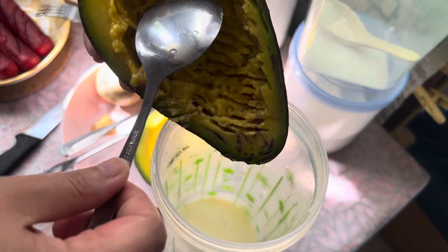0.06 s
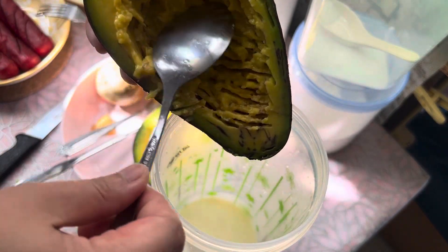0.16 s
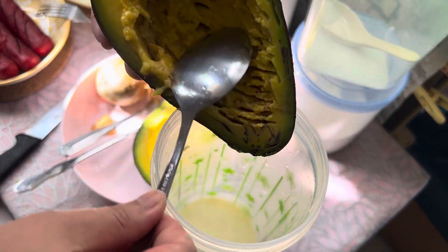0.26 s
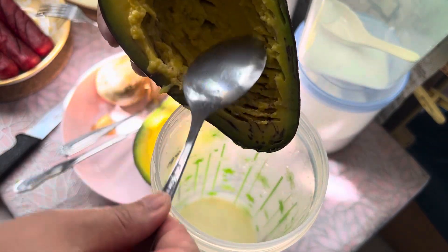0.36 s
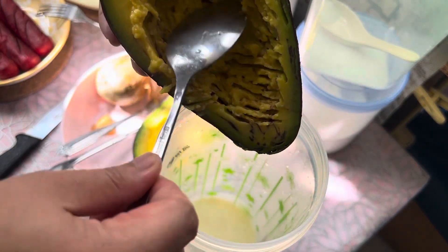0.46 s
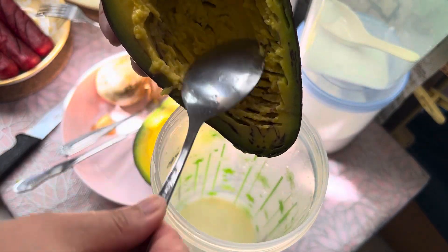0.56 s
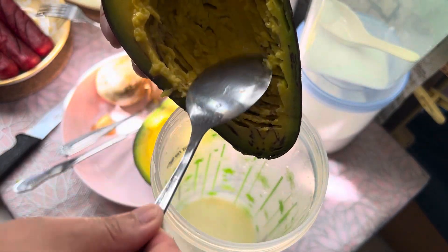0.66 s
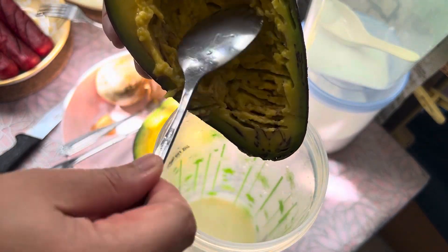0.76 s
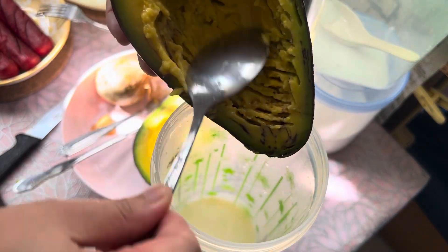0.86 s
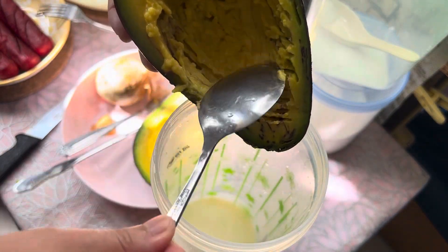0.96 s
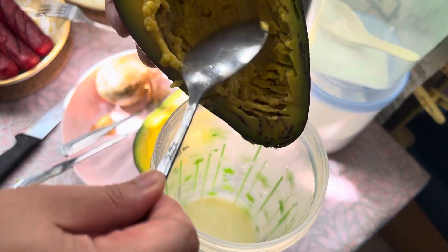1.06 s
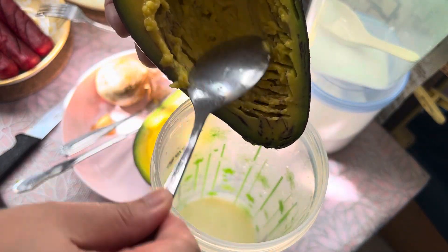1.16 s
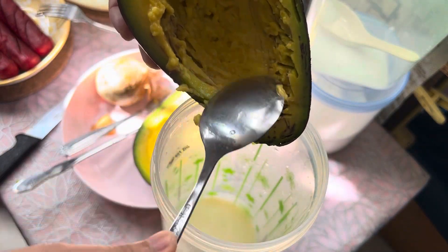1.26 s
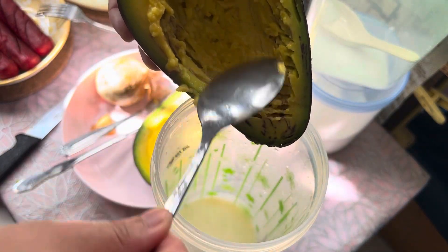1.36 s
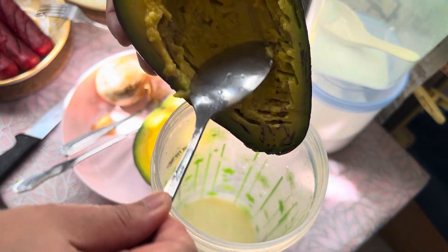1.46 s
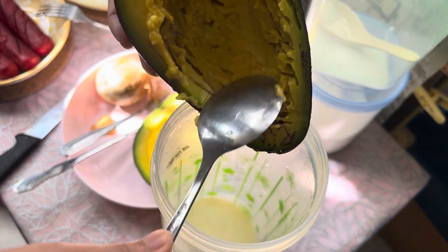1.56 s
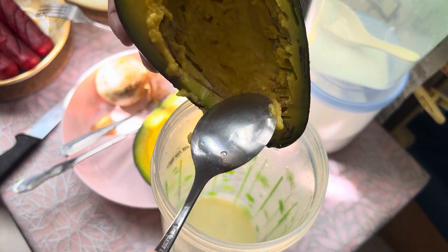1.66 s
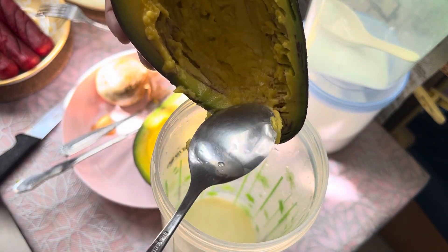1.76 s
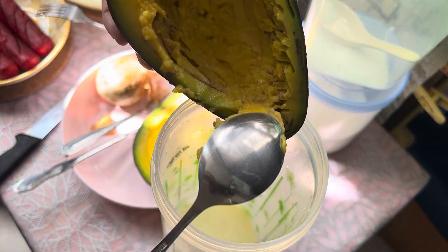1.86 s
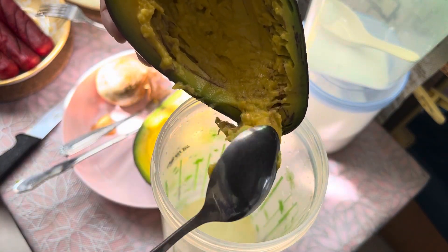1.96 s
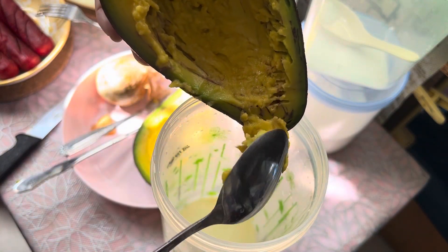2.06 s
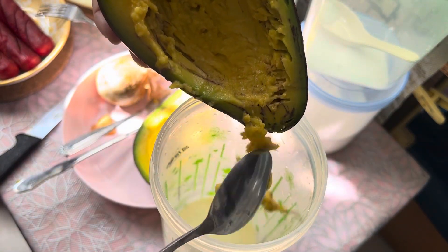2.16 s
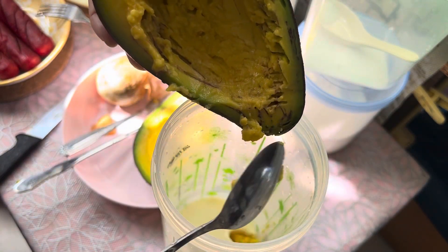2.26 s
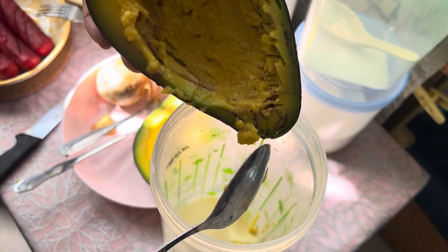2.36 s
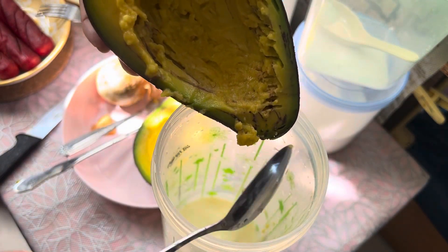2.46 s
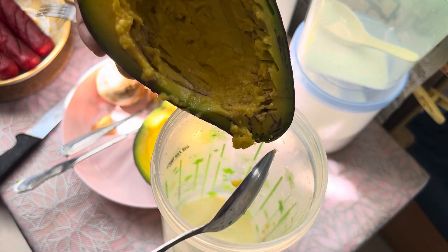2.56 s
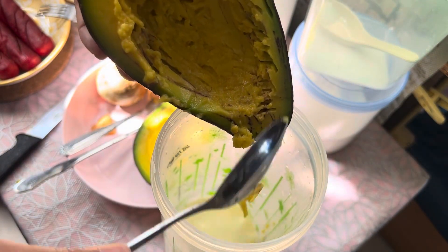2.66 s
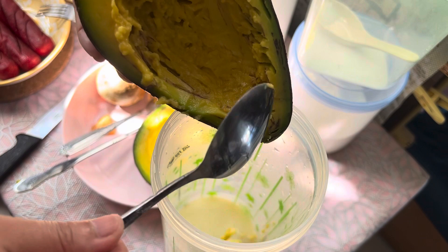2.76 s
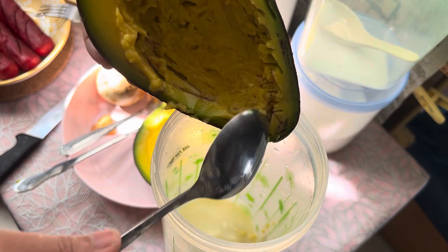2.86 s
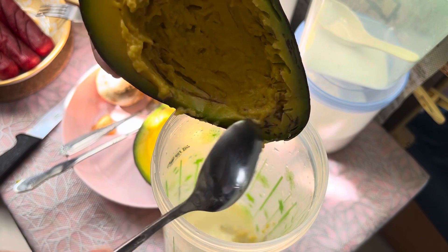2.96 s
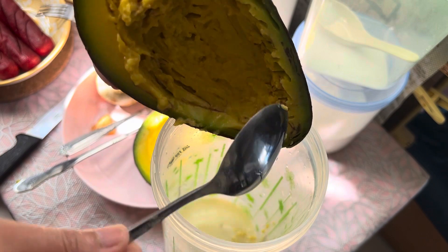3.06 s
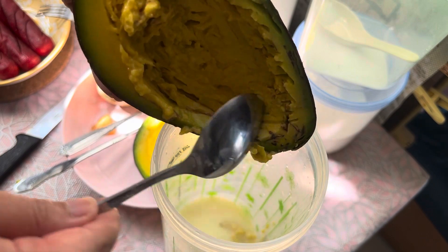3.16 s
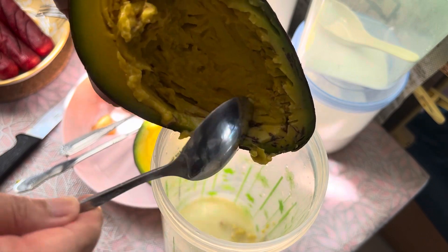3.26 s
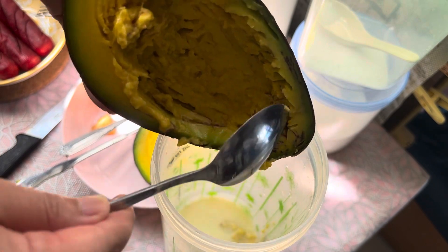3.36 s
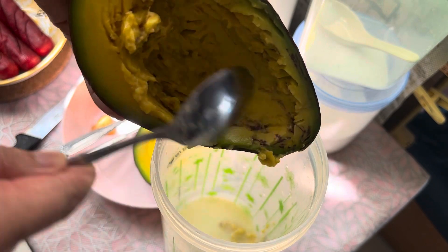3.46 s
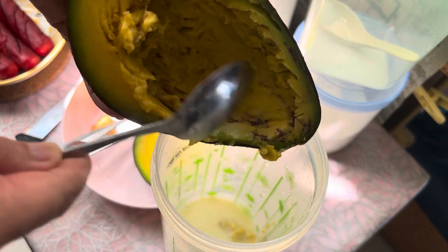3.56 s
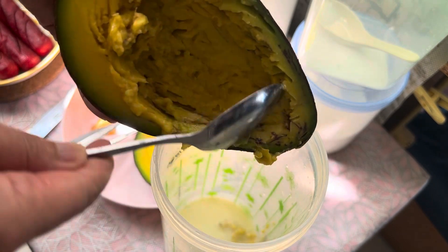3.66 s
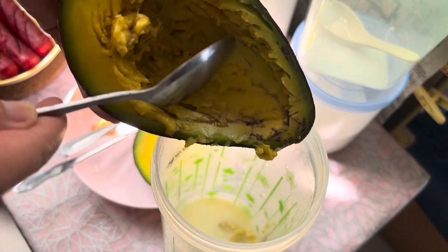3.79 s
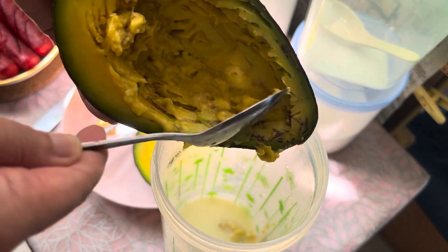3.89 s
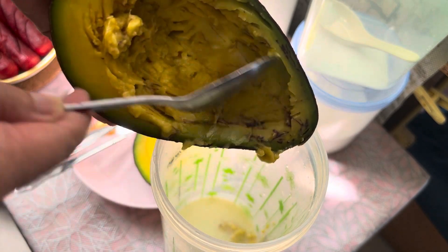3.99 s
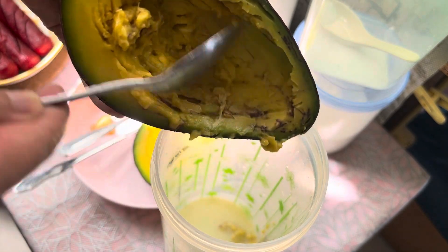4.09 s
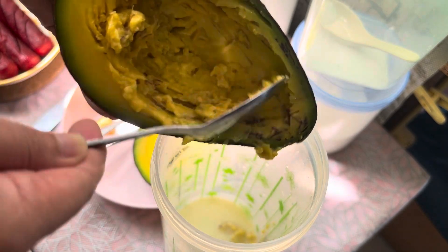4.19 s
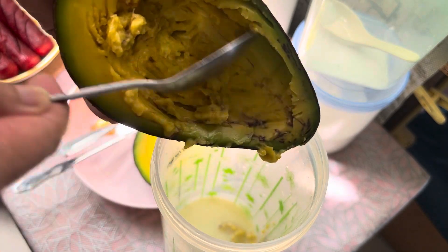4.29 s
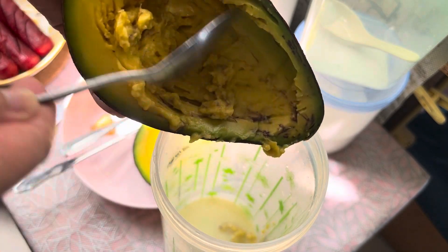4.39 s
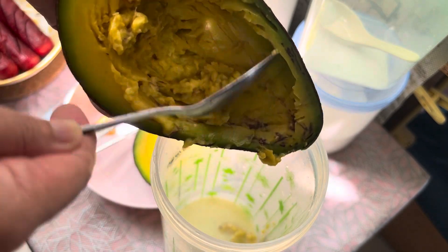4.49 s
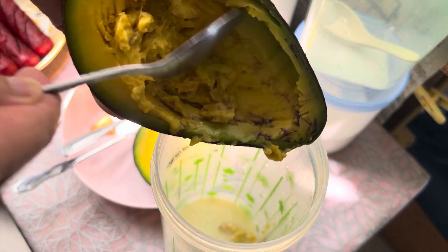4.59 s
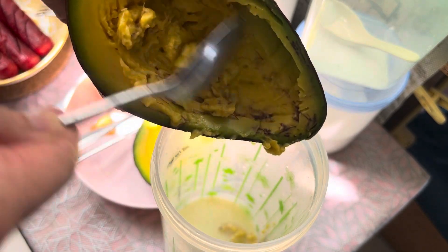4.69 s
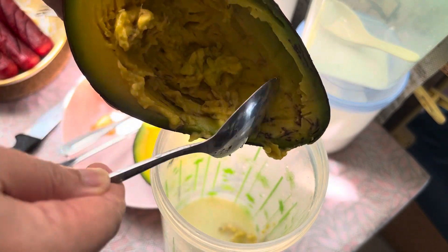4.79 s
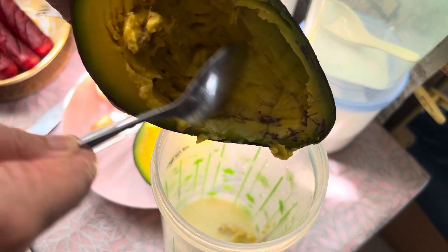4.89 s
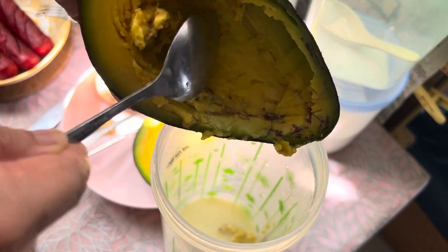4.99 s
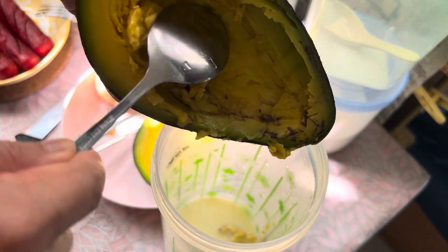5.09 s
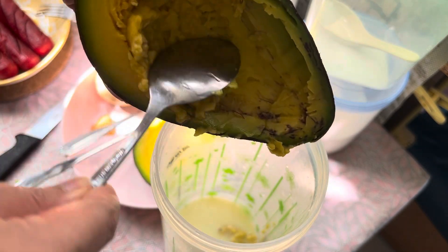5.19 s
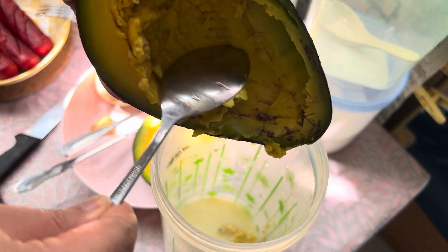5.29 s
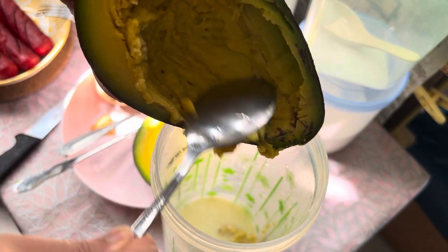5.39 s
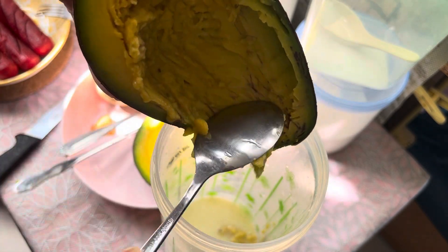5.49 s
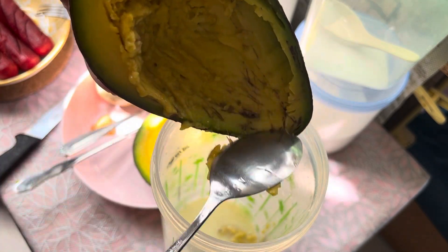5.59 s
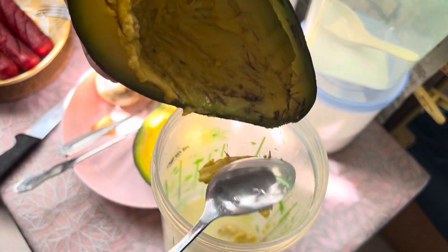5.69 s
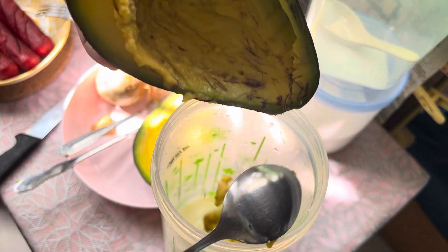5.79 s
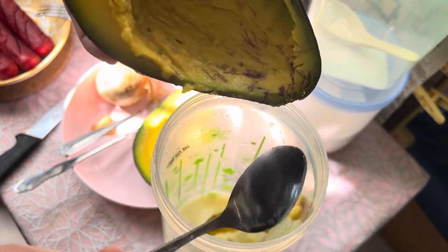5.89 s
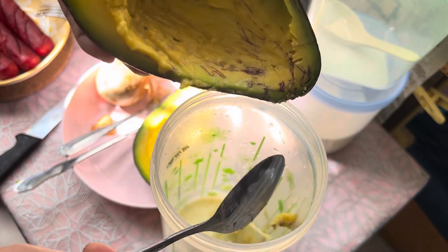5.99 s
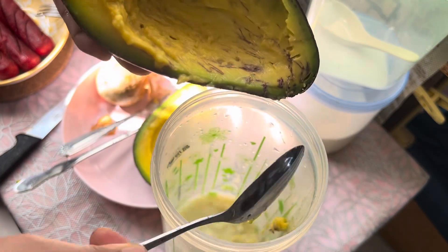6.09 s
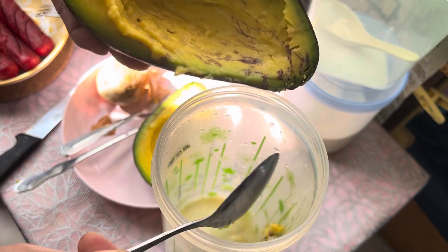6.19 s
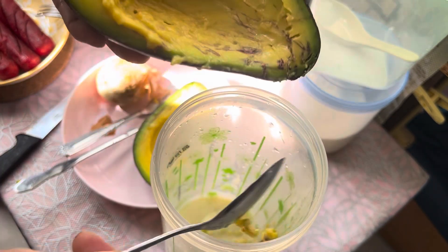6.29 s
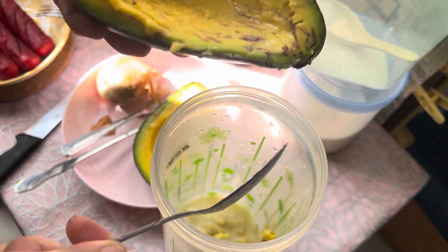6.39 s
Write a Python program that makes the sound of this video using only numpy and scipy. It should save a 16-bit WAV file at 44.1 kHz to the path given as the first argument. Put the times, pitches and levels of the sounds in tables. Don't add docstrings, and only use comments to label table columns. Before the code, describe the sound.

A metal spoon scrapes soft fruit from its skin in wet gritty strokes, with sticky ticks and two bursts of knocks on a plastic cup.

```python
import sys
import numpy as np
from scipy import signal
from scipy.fft import rfft, irfft, next_fast_len
from scipy.io import wavfile
from scipy.ndimage import uniform_filter1d

SR = 44100
rng = np.random.default_rng(int(sys.argv[2]) if len(sys.argv) > 2 else 0)


def store_wav(level_fs):
    pcm = np.round(np.clip(np.atleast_2d(level_fs), -1, 1) * 32767)
    wavfile.write(sys.argv[1], SR, pcm.T.astype(np.int16))


def decibels_to_gain(level_db):
    exponent = np.asarray(level_db, float) / 20
    return 10 ** exponent


N = 284004

# frequency in Hz, likeness from -1 to 1.
PORT_LIKENESS = [(60, 1), (200, 0.92), (400, 0.33), (800, -0.44), (1500, 0.11), (2500, 0.53), (4500, 0.98),
                 (6300, -0.015), (7200, 0.98), (8000, 0.7)]
# frequency in Hz, level in dB, decay time t60 in seconds.
RIM = [(2375, 0, .018), (2620, -1, .012), (2780, -5, .016), (2950, -6, .01)]
# frequency in Hz, level in dB, decay time t60 in seconds.
WALL = [(1655, 0, .028), (1860, -5, .025)]


def evened(x):
    return x / np.sqrt(np.mean(x ** 2) + 1e-20)


def read(points, hz):
    f, value = np.transpose(points)
    return np.interp(np.log(hz + 1), np.log(f + 1), value)


def add(mix, s, sound):
    part = mix[round(s * SR):][:len(sound)]
    part += sound[:len(part)]


def coloured(x, spectrum):
    gain = decibels_to_gain(read(spectrum, np.fft.rfftfreq(len(x), 1 / SR)))
    return evened(irfft(rfft(x) * gain, len(x)))


def slow(seconds):
    size = max(round(seconds * SR), 1)
    once = uniform_filter1d(rng.standard_normal(N), size)
    return evened(uniform_filter1d(once, size))


def port_pair(z, likeness):
    common = np.sqrt(1 + likeness) * z[0]
    apart = np.sqrt(1 - likeness) * z[1]
    return np.array([common + apart, common - apart])


def pair(colour_db, patchy_db, likeness, size):
    speckle_db = 1.87
    frames, hz = 4 * N // size + 5, np.fft.rfftfreq(size, 1 / SR)
    a, b, c, d, chance = rng.standard_normal((frames, len(hz), 5)).T
    speckle = uniform_filter1d(chance[::-1], size=2, axis=0)
    speckle = evened(uniform_filter1d(speckle, size=4, axis=1))
    patches = evened(uniform_filter1d(uniform_filter1d(chance, 8, 0), 8, 1))
    same = np.clip(read(PORT_LIKENESS, hz) + likeness, -1, 1)[:, None]
    same[hz > 8200] = .97
    gain_db = read(colour_db, hz)[:, None] + patchy_db * patches + speckle_db * speckle
    z = port_pair([a + 1j * b, c + 1j * d], same) * decibels_to_gain(gain_db)
    return evened(signal.istft(z, nperseg=size, noverlap=size * 3 // 4)[1][:, :N])


def tilted(x, left_db, lead):
    size = next_fast_len(N + 4096)
    hz = np.fft.rfftfreq(size, 1 / SR)
    half = decibels_to_gain(read(left_db, hz) / 2) * np.exp(-.5j * lead(hz))
    return irfft(rfft(x, size) * np.array([half, 1 / half]), size)[:, :N]


def strokes(order, rest_db):
    attack_s, release_s = 0.027, 0.033
    # start in seconds, length in seconds, hiss level in dB, fizz level in dB.
    passes = [(0, 0.25, -66, -84), (0.36, 0.04, -78, -62), (0.448, 0.016, -56, -72),
              (0.843, 0.18, -71, -67), (1.161, 0.11, -78, -70), (1.465, 0.17, -86, -70.5),
              (2.234, 0.41, -64.5, -71), (2.646, .28, -71, -63.5), (2.946, 0.21, -59, -64),
              (3.147, 0.18, -77, -62), (3.406, 0.073, -65, -67.5), (3.56, 0.24, -70.5, -74),
              (3.96, 0.19, -63.5, -68), (4.114, 0.13, -59.5, -56.5), (4.247, 0.18, -59.5, -62),
              (4.438, 0.2, -62.5, -58.5), (4.774, .2, -65.5, -63.5), (5.008, 0.25, -66, -70),
              (5.301, 0.14, -59.5, -69), (5.527, 0.21, -65, -58.5), (5.778, 0.047, -60, -59.5),
              (5.882, 0.079, -54.5, -56), (5.968, 0.17, -69.5, -81)]
    t, rows = np.arange(0, N + 100, 100) / SR, np.array(passes)[:, :, None]
    start, length = rows[:, 0], rows[:, 1]
    swell = np.clip((t - start) / attack_s + .5, 0, 1)
    swell = swell * np.exp(-np.maximum(t - start - length, 0) / release_s)
    power = decibels_to_gain(2 * rest_db) + ((decibels_to_gain(rows[:, order]) * swell) ** 2).sum(0)
    return np.interp(np.arange(N) / SR, t, np.sqrt(power))


def grit(per_s, spread_db, length):
    tears = (rng.random(N) < per_s / SR) * decibels_to_gain(spread_db * np.minimum(rng.exponential(1, N), 4))
    return evened(1 + signal.lfilter([1], [1, -np.exp(-1 / (length * SR))], tears))


def scrape():
    # frequency in Hz, level in dB.
    hiss_colour = [(900, 1), (1800, -0.5), (2500, 0), (4500, -2), (6500, -10.5), (8500, -11), (11000, -23)]
    # frequency in Hz, level in dB.
    fizz_colour = [(4500, -7), (7000, -9), (10000, -5.5), (12000, -14), (14500, -4), (15900, -8.5),
                   (16300, -26)]
    patchy_db = 1.6
    tears = grit(170, 1.9, .0015)
    fine_tears = grit(120, 0.67, 0.00011)
    hiss = pair(hiss_colour, patchy_db, 0.025, size=512) * tears * strokes(order=2, rest_db=-73)
    fizz = pair(fizz_colour, patchy_db, 0, size=512) * tears * fine_tears * strokes(order=3, rest_db=-76)
    return decibels_to_gain(3.5) * hiss + decibels_to_gain(1.5) * fizz


def smack(db, dull_db, hz, length):
    # frequency in Hz, level in dB.
    spit = [(3500, -16.5), (4800, -11), (6300, -9.5), (8000, -2), (12000, -3.5), (15500, 0.5),
            (16900, -34.5)]
    t, noise = np.arange(2048) / SR, rng.standard_normal((2, 2048))
    shape = (1 - np.exp(-t / 0.0001)) * decibels_to_gain(-30 * t / max(length, .001))
    dull_colour = [(hz * 0.48, -30), (hz * 0.83, -6), (hz, 0), (hz * 1.28, -8), (hz * 4, -30)]
    bright = decibels_to_gain(db - 5.0) * coloured(noise[0], spit)
    dull = decibels_to_gain(dull_db - 3.5) * coloured(noise[1], dull_colour)
    return shape * (bright + dull)


def add_ticks(near):
    # time in seconds, level in dB, pitch
    # in Hz.
    ticks = [(0.132, -49, 8440), (0.178, -42, 15500), (0.183, -49, 15500), (0.209, -52, 15100),
             (0.214, -54, 5510), (0.3026, -43, 14900), (0.3695, -49, 14600), (0.3766, -58, 5520),
             (0.4517, -49, 6860), (0.5776, -50, 7300), (0.6864, -59, 5530), (0.8334, -47, 8270),
             (0.856, -47, 11200), (0.869, -39.5, 10600), (0.8904, -48, 15100), (0.992, -42.5, 8950),
             (1.0228, -46.5, 5500), (1.1531, -49.5, 9500), (1.2165, -40, 11800), (1.403, -50, 7130),
             (1.451, -47, 11000), (1.4684, -51, 6900), (1.506, -43, 14800), (1.537, -48, 5660),
             (1.5475, -50, 15000), (1.563, -50, 7200), (1.5833, -44.5, 11900), (1.6362, -54, 5500),
             (1.6497, -59, 7030), (1.7011, -57, 15500), (1.804, -47, 5670), (1.9804, -60, 5540),
             (3.0072, -62, 15400), (3.1269, -51, 15000), (3.165, -50, 15500), (3.2866, -56, 7390),
              (3.4213, -42.5, 6170), (3.4432, -57, 15200), (3.463, -45, 10800), (3.491, -42, 7640),
              (3.5215, -49, 14900), (3.617, -48, 5580), (3.745, -51, 7890), (3.7809, -56, 6520),
              (3.988, -56, 5500), (4.0072, -39, 15500), (4.0404, -55, 15190), (4.1306, -50, 7510),
              (4.2903, -54, 15100), (4.3342, -55, 6820), (4.6086, -49, 7670), (4.7906, -63, 5600),
              (4.8879, -56, 8110), (4.889, -38.5, 8200), (4.9233, -45, 14600), (5.1538, -62, 5640),
              (5.1538, -45, 5820), (5.1754, -38, 8300), (5.2047, -61, 7950), (5.302, -43.5, 5590),
              (5.5404, -62, 14900), (5.5459, -63, 5870), (5.5459, -53, 15100)]
    for s, db, hz in ticks:
        add(near, s - .0005, smack(db + 2, db + 3, hz, length=0.0027))


def add_smacks(near):
    # time in seconds, spit level in dB, dull level in dB, dull pitch in Hz,
    # length in seconds.
    breaks = [(1.6506, -62, -39, 6900, 0.0076), (3.2866, -58, -42, 7460, 0.0046),
              (5.837, -46, -46, 7500, .005), (5.864, -48, -49.5, 12000, .004),
              (5.903, -40, -36.5, 4300, .02), (2.2573, -29, -33, 4600, 0.0053),
              (2.3266, -40, -38.5, 4300, 0.0085), (2.389, -18, -29.5, 4170, 0.01),
              (2.43, -43, -43, 1730, 0.019), (2.455, -45, -44, 4220, 0.011), (2.462, -40, -47, 1620, 0.008),
              (2.811, -33.5, -61, 3990, 0.017), (2.88, -44, -34.5, 1820, 0.012),
              (2.8805, -50, -40, 3220, .008), (5.892, -26, -31, 2720, 0.0062),
              (5.719, -41, -44, 3240, 0.011), (5.7852, -23, -27.5, 7500, 0.0098),
              (5.796, -29.5, -40, 2500, .012), (5.791, -23.5, -40, 2390, 0.016),
              (5.8823, -24, -47, 6000, 0.0034), (5.8888, -18.5, -32, 7500, 0.0032),
              (5.8899, -6.5, -20, 3900, 0.0029), (6.329, -41, -44, 8000, 0.0067),
              (5.948, -45, -42, 7200, .004), (6.08, -46, -51, 9000, .005), (2.125, -51, -51, 4500, .006),
              (5.9566, -37.5, -31, 2300, 0.012), (6.375, -42, -38, 1700, 0.01),
              (6.3753, -50, -36, 4000, 0.0096)]
    for s, *row in breaks:
        add(near, s - .0005, smack(*row))


def pop(db, hz, length, rough):
    t, rough = np.arange(0, length, 1 / SR), np.clip(rough, 0, 1)
    wide = 1 + 0.32 * rough ** 2 + .03
    band = [(hz / wide ** 2, -30), (hz / wide, -5), (hz, 0), (hz * wide, -5), (hz * wide ** 2, -30)]
    noise = coloured(rng.standard_normal(4096), band)[:len(t)]
    tone = np.sin(2 * np.pi * hz * t * (1 + 0.0095 * t / length))
    shape = np.sin(np.pi * (t / length) ** 0.6) ** 2
    return decibels_to_gain(db) * ((1 - rough) * tone + 0.64 * rough * noise) * shape


def add_pops(near):
    # time in seconds, level in dB, pitch in Hz, length in seconds,
    # roughness from 0 to 1.
    pockets = [(0.252, -56, 3160, 0.028, 0.4), (0.283, -56, 2000, 0.03, 0.3), (0.458, -54, 2500, 0.016, 1),
               (0.939, -51, 4000, 0.04, 0.64), (1.456, -49.5, 3240, 0.016, 0.5),
               (1.708, -45, 2540, 0.023, 0.56), (1.721, -52, 2500, 0.032, .6),
               (1.636, -54, 5600, .012, 0.49), (0.28, -56, 1980, .015, .4), (.135, -57, 3200, .012, .4),
               (.587, -53, 2050, .015, .5), (.303, -52, 2700, .005, .8), (1.93, -49.5, 1820, 0.023, 0.06),
               (2.354, -43, 3180, 0.012, 0.25), (2.829, -47.5, 4120, .006, 0.4),
               (3.131, -46.5, 3000, 0.013, 1.1), (3.43, -49, 1885, 0.027, 0.17),
               (3.622, -42, 3240, 0.013, 0.5), (3.694, -48, 4200, 0.017, 0.47),
               (4.139, -43, 2900, .003, 1.2), (4.338, -48, 6700, 0.0048, 0.4),
               (4.619, -48, 1826, 0.045, 0.56), (5, -47.5, 3600, .006, 0.4),
               (4.95, -39.5, 2500, 0.00305, 1), (4.963, -42.5, 2880, .003, 0.7),
               (5.071, -50.5, 3400, 0.0085, 1.1), (5.503, -48, 1830, 0.014, 0.3),
               (5.726, -46, 3220, 0.018, 0.3), (5.912, -40.5, 3600, 0.052, 0.66),
               (5.866, -47, 3600, .008, .4), (5.82, -48.5, 2500, .05, .7), (2.256, -39, 1340, 0.012, 0.37)]
    for s, db, hz, length, rough in pockets:
        add(near, s - length / 3, pop(db, hz, length, rough))


def thump(db, hz):
    t = np.arange(0, .12, 1 / SR)
    return decibels_to_gain(db - 1320 * t) * np.sin(2 * np.pi * hz * t) * (1 - np.exp(-t / 0.0016))


def add_thumps(near):
    # time in seconds, level in dB, pitch in Hz.
    pushes = [
        (1.75, -44, 70),
        (2.384, -32.5, 66),
        (5.901, -21, 81.6),
        (5.911, -30, 90),
    ]
    for s, *row in pushes:
        add(near, s, thump(*row))


def ring(modes, rise, ragged):
    t, (hz, db, t60) = np.arange(12000)[:, None] / SR, np.transpose(modes)
    spot = rng.standard_normal((2, len(hz)))
    turns = 2 * np.pi * hz * (1 + .004 * spot[1]) * (t - rise) + .35 * spot[1]
    x = (decibels_to_gain(db + 1.0 * spot[0] - 60 * t / t60) * np.sin(turns)).sum(1)
    chatter = ragged * rng.standard_normal(300) * np.exp(-np.arange(300) / 90)
    x = x + signal.fftconvolve(x, chatter)[:len(x)]
    x = x * (1 - np.exp(-(t[:, 0] / rise) ** 3))
    return x / abs(x).max()


def knock(db, wall_db, edge_db, crack_db, rock_db, boom_db, low_db, band_db, lip_db):
    # frequency in Hz, level in dB, decay time t60 in seconds.
    edge = [(3300, -2, 0.015), (3540, -2, .02), (3710, 0, 0.025)]
    rock = [(65, -14, .1), (110, -16, .08), (195, -4, .14), (230, 0, .17), (273, -4, .14), (450, -9, .04),
            (545, -10, .035)]
    boom = [(369, 0, .15), (435, -13, .045), (520, -13, .03), (620, -16, .03), (720, -16, .05),
            (862, -18, .06)]
    wall_low = [(1211, -1, .045), (1335, 0, .028)]
    wall_band = [(1060, -4, .04), (1520, 0, .055)]
    lip = [(4420, 0, 0.016), (4700, -3, .014), (5080, -1, 0.015), (5580, -6, 0.008)]
    # frequency in Hz, level in dB.
    rattle = [(120, -3), (400, 0), (800, -0.5), (1500, 5), (2100, 2.5), (2800, -8.5), (4500, -9),
              (9000, -39)]
    body = ring(RIM, .0025, .01)
    body += decibels_to_gain(wall_db) * ring(WALL, .003, .01)
    body += decibels_to_gain(edge_db) * ring(edge, .0022, .03)
    t = np.arange(len(body)) / SR
    swell = 1 - np.exp(-(t / .0025) ** 3)
    fade = decibels_to_gain(-6 - 60 * t / 0.02) + decibels_to_gain(-19 - 60 * t / 0.062) + decibels_to_gain(-25 - 60 * t / 0.24)
    body += fade * swell * coloured(rng.standard_normal(len(t)), rattle)
    add(body, 0, smack(crack_db, crack_db, 5500, .011))
    cup = decibels_to_gain(rock_db) * ring(rock, .005, 0)
    cup += decibels_to_gain(boom_db) * ring(boom, .0035, 0)
    cup += decibels_to_gain(lip_db) * ring(lip, .0022, .04)
    cup += decibels_to_gain(low_db) * ring(wall_low, .004, .01)
    cup += decibels_to_gain(band_db) * ring(wall_band, .004, .01)
    return decibels_to_gain(db + 4.0) * body + cup


def add_knocks(near):
    # time in seconds, blow level in dB, then upper wall, edge and bright crack in dB
    blows = [
        (2.1626, -15, -10, -9, -16),
        (2.36, -17, -7.5, -13.5, -26.5),
        (2.526, -15.5, -9.5, -11, -17),
        (5.9734, -12.5, -14.5, -8, -22),
        (6.1589, -16.5, -5.5, -15.5, -29.5),
        (6.3117, -20.5, -12.5, -19, -16),
    ]
    # cup rocking, air in the cup, lower wall,
    # wall band and lip, all in dB.
    spots = [(-23, -20.5, -25.5, -48, -29), (-20, -20, -25, -31, -36), (-20.5, -22, -22.5, -45, -24.5),
             (-23.5, -20.5, -26.5, -26, -29), (-17.5, -20.5, -19, -32, -32.5), (-20, -30, -26.5, -45, -25)]
    spoon_db = [-39, -44, -48, -32, -47, -48]
    # frequency in Hz, level in dB, decay time t60 in seconds; then the lag in seconds.
    spoon, lag_s = [(2155, 0, .13), (2228, -9, .09)], .006
    for (s, *row), spot, ring_db in zip(blows, spots, spoon_db):
        add(near, s - .0015, knock(*row, *spot))
        add(near, s + lag_s, decibels_to_gain(ring_db) * ring(spoon, 0.016, .02))


def add_bounces(near):
    # time in seconds, level in dB.
    touches = [
        (2.1655, -37),
        (5.978, -32),
        (6.1625, -16.5),
        (6.317, -19),
        (6.328, -29),
    ]
    for s, db in touches:
        add(near, s - .001, decibels_to_gain(db) * ring(RIM + WALL, .001, .02))


def kitchen(x):
    # frequency in Hz, decay time t60 in seconds.
    decay = [(150, .25), (400, 0.24), (1000, 0.28), (2800, 0.14), (7000, 0.06), (15000, 0.04)]
    taps = np.zeros((2, SR // 2))
    at = np.arange(120, SR // 2 - 20, 20) + rng.integers(0, 20, (2, (SR // 2 - 121) // 20))
    np.put_along_axis(taps, at, rng.choice([-1., 1.], at.shape), 1)
    hz, t, z = signal.stft(taps, SR, nperseg=256)
    same = np.clip(read(PORT_LIKENESS, hz), -1, 1)[:, None]
    thin = (hz / (hz + 700))[:, None] ** 2
    z = port_pair(z, same) * thin * decibels_to_gain(-60 * t / read(decay, hz)[:, None])
    tail = signal.istft(z, SR, nperseg=256)[1]
    return signal.fftconvolve(x[None], tail / np.linalg.norm(tail[0]), axes=1)[:, :N]


def room_tone():
    # time in seconds, level in dB.
    swell_db = [(0.0, -54), (0.75, -53), (1.45, -51.5), (1.59, -51), (2.46, -51), (2.67, -53.5),
                (2.89, -53.5), (3.23, -53.5), (3.69, -52), (4.41, -54.5), (4.68, -53), (5.5, -55),
                (6.12, -52), (6.44, -50.5)]
    # frequency in Hz, level in dB per Hz.
    air_colour = [(15, -30), (35, -29), (60, -6), (110, -4), (165, -8.5), (200, -4.5), (285, -8),
                  (340, -12.5), (520, -14.5), (690, -10), (950, -17), (1900, -22), (3300, -29), (7000, -34)]
    # pitch in Hz, level in dB, waver in dB.
    machines = [(77, -16, 0), (103.5, -14, 7), (199.7, -11.5, 2.5), (241.6, -2, 2), (277, -13, 3.5)]
    air = pair(air_colour + [(9500, -44.5), (12000, -73)], 1.24, 0, size=2048)
    t = np.arange(N) / SR
    drone = np.zeros(N)
    for hz, db, waver_db in machines:
        level = decibels_to_gain(db + waver_db * slow(0.1))
        drone += level * np.sin(2 * np.pi * hz * t + 0.47 * slow(0.036))
    return decibels_to_gain(np.interp(t, *np.transpose(swell_db)) + 1.5) * (air + drone)


def scene():
    # frequency in Hz, left minus right in dB.
    near_left_db = [(200, 1), (380, 5), (700, 5.5), (2400, 3.5), (4400, -1.5), (7500, -2)]
    near = np.zeros(N)
    for add_source in (add_ticks, add_smacks, add_pops, add_thumps, add_knocks, add_bounces):
        add_source(near)
    near = tilted(near + decibels_to_gain(-23) * kitchen(near), near_left_db, np.zeros_like)
    return near + scrape() + room_tone()


def thin_treble(ports):
    # frequency in Hz, level in dB.
    weaker_db = [(6600, -60), (7000, -5), (16000, -5)]
    hz, t, z = signal.stft([ports[0] + ports[1], ports[0] - ports[1]], SR, nperseg=1024)
    power = uniform_filter1d(uniform_filter1d(abs(z) ** 2, 8, 1), 2, 2)
    power_db = 10 * np.log10(power + 1e-20)
    wander_db = 1.8 * evened(uniform_filter1d(rng.standard_normal(len(t)), 3))
    bright_db = power_db[:, hz > 7000].mean((0, 1))
    hz = hz[:, None]
    keep = power_db - power_db[::-1] > read(weaker_db, hz) + wander_db / 2
    keep |= bright_db > uniform_filter1d(bright_db, 7) + 3.5
    keep &= (hz < 7000) | (power_db > -102 + wander_db)
    keep &= (hz < 15950) | (power_db > -81) & (hz < 16800)
    total, apart = signal.istft(z * keep, SR, nperseg=1024)[1][:, :N]
    return np.array([total + apart, total - apart]) / 2


def top_cut(x):
    return signal.sosfilt(signal.butter(12, 17500, fs=SR, output="sos"), x)


def record(dry):
    # frequency in Hz, left minus right in dB.
    left_db = [(100, -1), (200, -2.5), (380, 0.5), (800, -1.5), (1800, -0.5), (2400, 2), (5000, 4.5),
               (6400, 3), (7200, 1.5)]
    # frequency in Hz, lead of the right port in radians.
    right_lead = [(300, -0.18), (1000, -0.64), (2000, -1.05), (3200, -0.86), (4500, -1.1), (6000, 1.33),
                  (6800, -1.2), (7600, -0.14)]

    def lead(hz):
        return read(right_lead, hz) + 2 * np.pi * np.maximum(hz - 7600, 0) / 3880

    return top_cut(thin_treble(tilted(dry, left_db, lead)))


dry = scene()
out = record(dry)
store_wav(out)
```